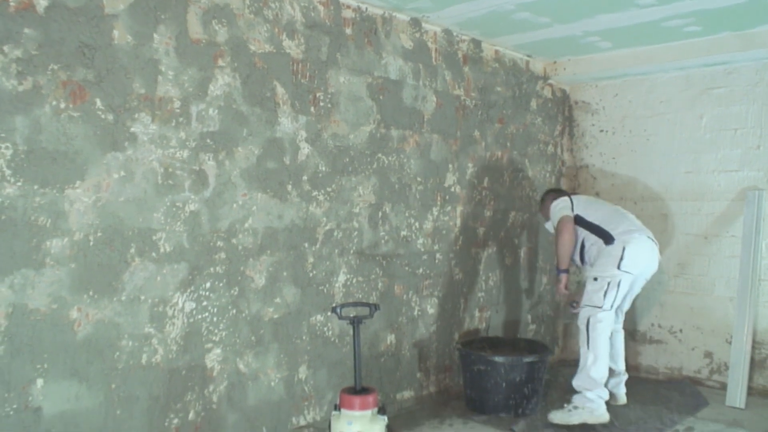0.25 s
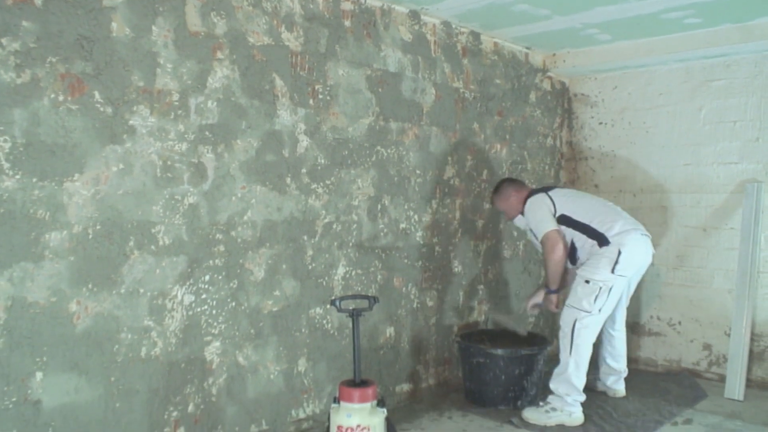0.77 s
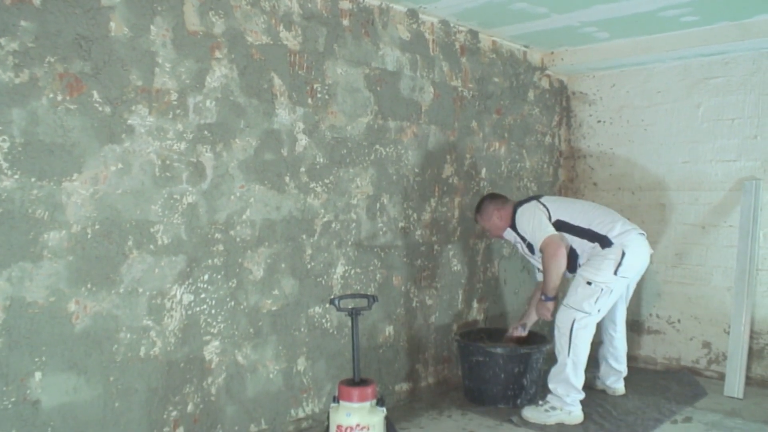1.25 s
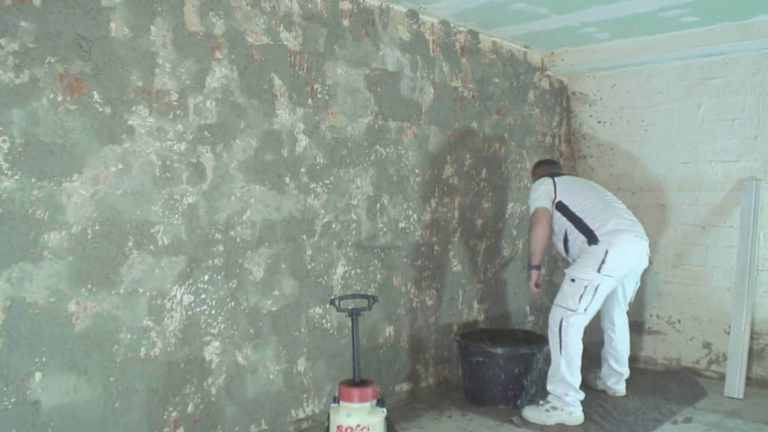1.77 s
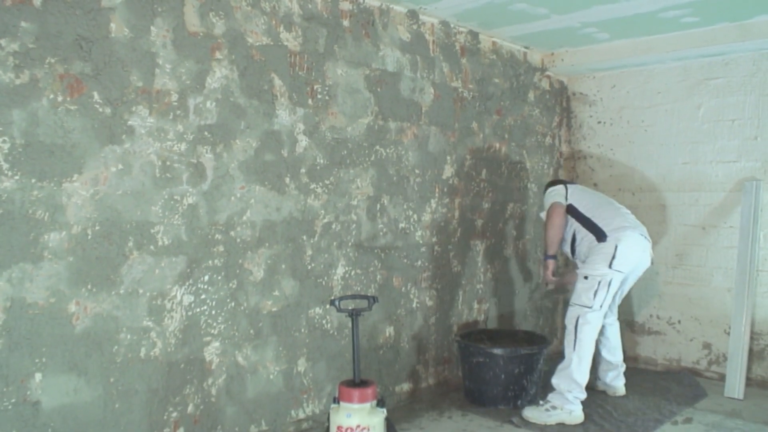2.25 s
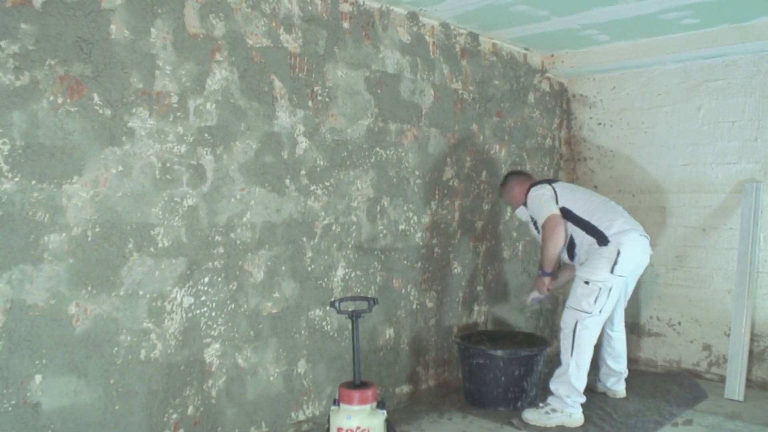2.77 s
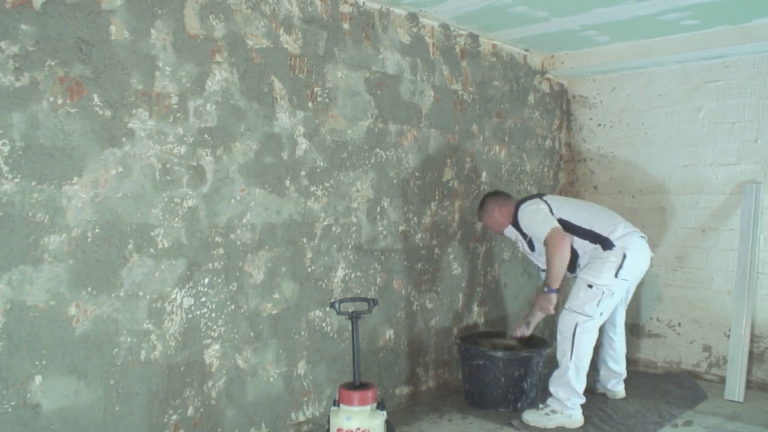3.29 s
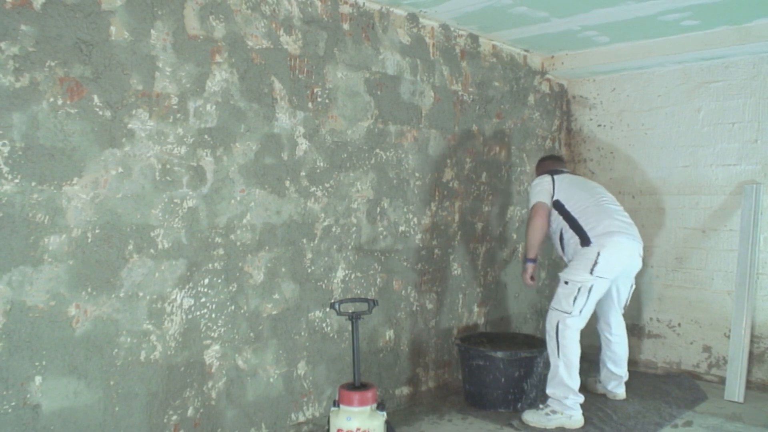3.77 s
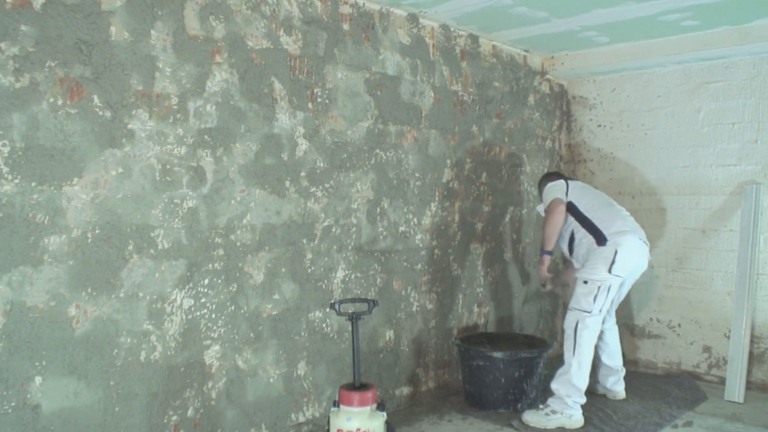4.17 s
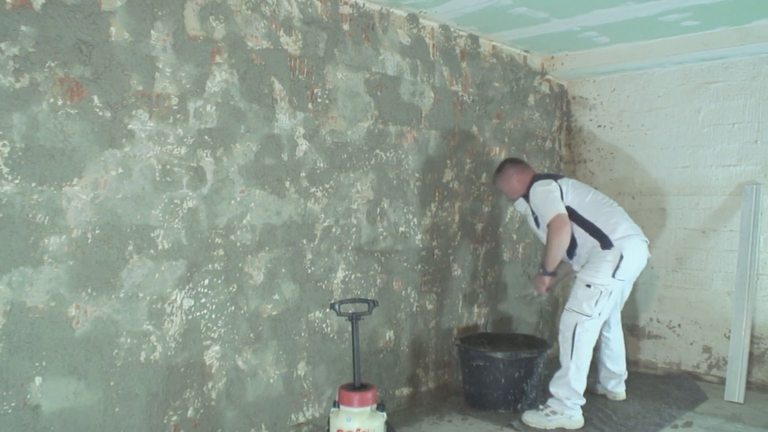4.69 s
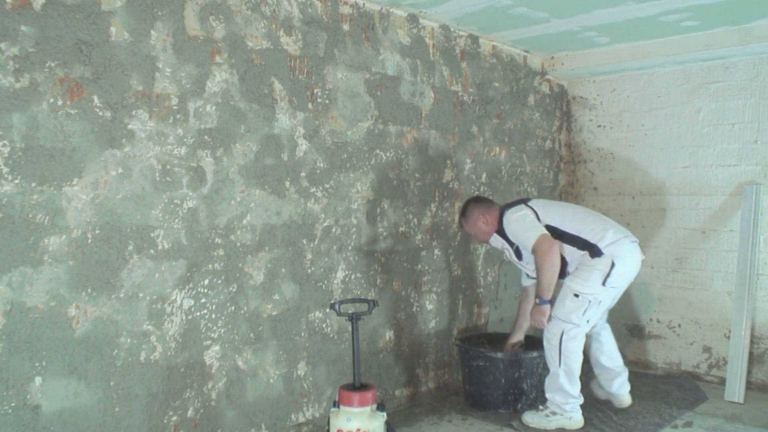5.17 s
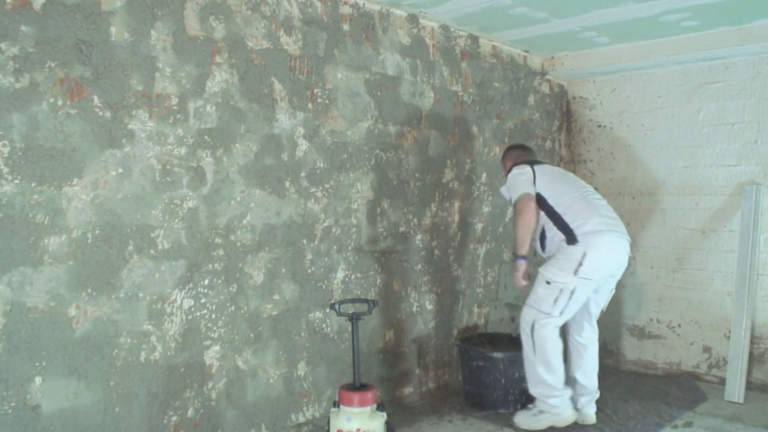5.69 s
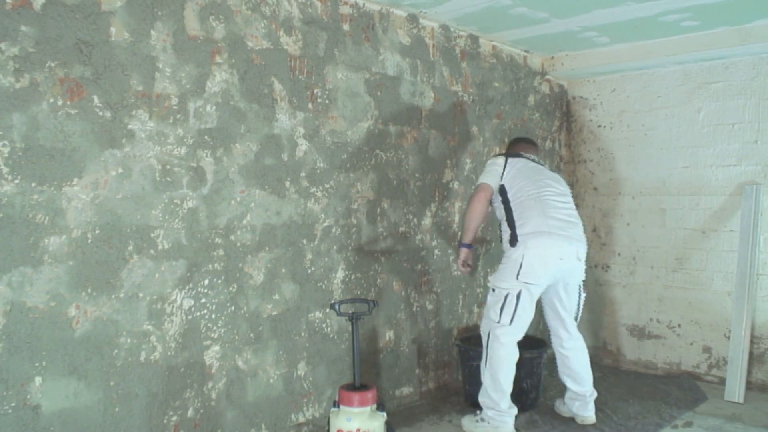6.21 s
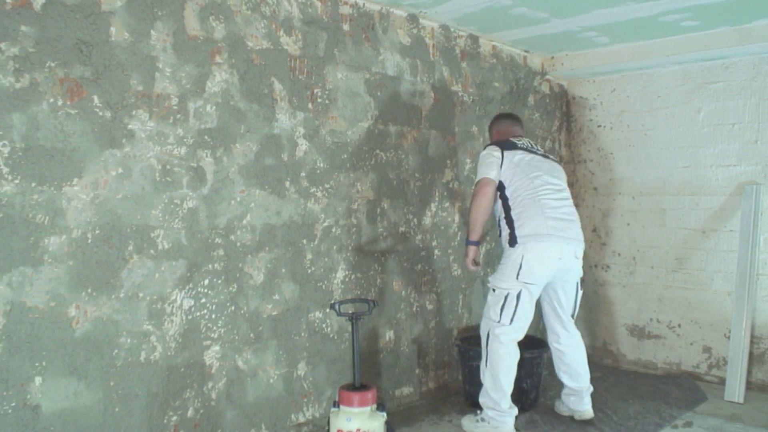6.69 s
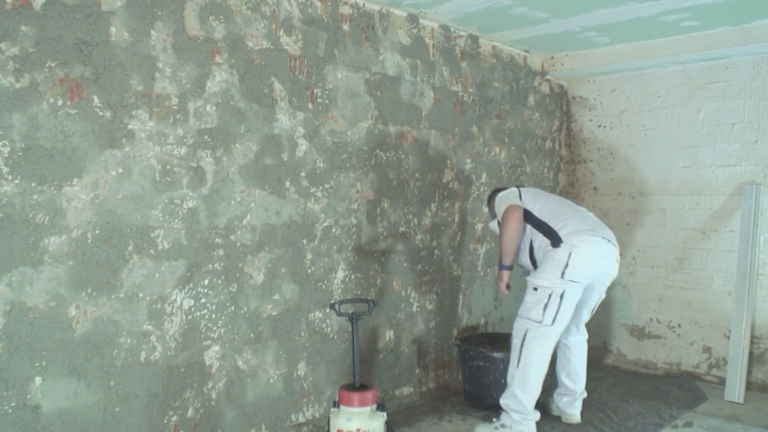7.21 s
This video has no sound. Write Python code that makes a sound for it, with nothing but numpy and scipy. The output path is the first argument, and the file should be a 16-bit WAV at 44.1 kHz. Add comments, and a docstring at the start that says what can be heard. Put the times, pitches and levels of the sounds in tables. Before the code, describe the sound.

Low wind rumble surges and puffs against the microphone throughout. Over it, four loads of mortar hit the wall with dull, sharp-edged splats and crumbs raining after. Between throws come gritty scoops, hollow tub drag, wet fizz, small cracks and knocks, and two clearer, quickly damped blade clinks. The work sounds fairly close in a hard-walled basement with a short echo.

```python
"""Wet mortar is flung at a masonry wall four times in a bare basement: click bursts with resonant
pockets make the slaps, damped sines the blobs and droplets. In between, filtered grains make the trowel
scrape, tick and squelch on a plastic tub, and decaying partials make the blade clink. A draught of shaped
noise and low puffs buffets two microphone ports and hums once, mostly across the left one."""
import sys
import numpy as np
from scipy import signal
from scipy.fft import rfft, irfft, next_fast_len
from scipy.io import wavfile
from scipy.ndimage import uniform_filter1d

SR = 44100
rng = np.random.default_rng(int(sys.argv[2]) if len(sys.argv) > 2 else 0)


def store_wav(level_fs):
    """Save 16-bit WAV to argv[1]."""
    pcm = np.round(np.clip(np.atleast_2d(level_fs), -1, 1) * 32767)
    wavfile.write(sys.argv[1], SR, pcm.T.astype(np.int16))


N = 328545
TIME = np.arange(N) / SR

# Loads sliding off the blade as the arm swings. Each row: release in seconds, level in dB before trim.
SWINGS = [(0.365, -46.5), (2.593, -49.5), (4.556, -51), (6.8, -51.5)]
# Colour of mortar hitting the wall. Each row: frequency in Hz, relative level in dB.
SLAP_COLOUR = [(120, -11.5), (250, -3), (400, -1), (600, -6.5), (850, -7), (1500, -10), (3000, -11.5),
               (6000, -11.5), (10000, -12), (15000, -18.5)]


def gain_of(db):
    """Converts decibels to amplitude."""
    return np.exp(np.asarray(db) * (np.log(10) / 20))


def evened(x):
    """Scales to rms 1."""
    return x / np.sqrt(np.mean(x ** 2) + 1e-20)


def read(points, hz):
    """Interpolates a (Hz, value) table on a log-frequency axis."""
    f, value = np.transpose(points)
    return np.interp(np.log(hz + 1), np.log(f + 1), value)


def resonance(hz, centre_hz, peak_db, width):
    """Level in dB of one resonant peak; width is a share of its pitch."""
    return peak_db / (1 + (np.log(hz / centre_hz) / width) ** 2)


def add(mix, s, sound):
    """Mixes a sound in at time s."""
    part = mix[max(round(s * SR), 0):][:len(sound)]
    part += sound[:len(part)]


def tinted(x, colour):
    """Gives a steady sound a spectrum, at rms 1."""
    size = next_fast_len(len(x), True)
    gain = gain_of(read(colour, np.fft.rfftfreq(size, 1 / SR)))
    return evened(irfft(rfft(x, size) * gain, size)[:len(x)])


def struck(x, colour, size=2048):
    """Gives a blow a spectrum by a minimum-phase filter, so that its attack stays sharp."""
    log_gain = np.log(gain_of(read(colour, abs(np.fft.fftfreq(size, 1 / SR)))))
    ring = np.fft.ifft(np.exp(np.conj(signal.hilbert(log_gain)))).real[:size // 2]
    return signal.fftconvolve(x, ring / np.linalg.norm(ring))


def grains(count, per_s, spread_db):
    """Random clicks of either sign, a few of them larger than the rest, at rms 1."""
    sizes = gain_of(spread_db * np.minimum(rng.exponential(1, count), 4))
    signs = rng.choice([-1, 1], count)
    return evened(sizes * signs * (rng.random(count) < per_s / SR))


def burst(length, per_s, spread_db, rise=0.0011):
    """A cluster of clicks that rises and dies away, its spectrum smoothed flat."""
    t = np.arange(2 ** 14) / SR
    shape = np.exp(-t / length) * (1 - np.exp(-t / rise))
    z = rfft(grains(len(t), per_s, spread_db) * shape)
    z /= np.sqrt(uniform_filter1d(abs(z) ** 2, size=70) + 1e-12)
    return evened(irfft(z) * (t < 6 * length)) * np.sqrt(np.mean(shape ** 2))


def plop(db, hz, length, glide, rise):
    """One damped resonance whose pitch slides by glide octaves in each decay time."""
    t = np.arange(0, 6 * length, 1 / SR)
    turns = np.cumsum(hz * 2 ** (glide * t / length)) / SR
    return gain_of(db) * np.sin(2 * np.pi * turns) * np.exp(-t / length) * (1 - np.exp(-t / rise))


def swell(s, length):
    """A bell-shaped rise and fall around time s."""
    out = np.zeros(N)
    near = slice(max(int((s - 3 * length) * SR), 0), int((s + 3 * length) * SR))
    out[near] = np.exp(-2 * ((TIME[near] - s) / length) ** 2)
    return out


def stroke(s, length, attack, release):
    """Grows to full strength at time s, holds, and dies away exponentially."""
    before = np.minimum(TIME - s, 0) / attack
    after = np.maximum(TIME - s - length, 0) / release
    return np.exp(np.maximum(before - after, -20))


def wander(top_hz):
    """Random motion over the two octaves below top_hz, at rms 1."""
    t, rates = TIME[::64], np.geomspace(top_hz / 4, top_hz, 16)
    motion = sum(np.sin(2 * np.pi * (hz * t + rng.random())) for hz in rates)
    return np.interp(TIME, t, evened(motion))


def patchy(x, depth_db):
    """Lets the colour wander in patches a few hundred hertz wide and some tens of ms long, at rms 1."""
    z = signal.stft(x, nperseg=512, noverlap=384)[2]
    patches = rng.standard_normal(z.shape)
    for _ in range(2):
        patches = uniform_filter1d(patches, size=5, axis=0)
        patches = uniform_filter1d(patches, size=16, axis=1)
    z = z * gain_of(depth_db * evened(patches))
    return evened(signal.istft(z, nperseg=512, noverlap=384)[1][:N])


def room_air():
    """The faint steady wash of the room: shaped noise, partly common to both channels."""
    # Each row: frequency in Hz, relative level in dB.
    air_colour = [(100, 12), (300, 4.5), (500, -7), (900, -13.5), (2000, -21.5), (5000, -31.5),
                  (11000, -37), (14000, -81), (15500, -87.5)]
    common, left, right = (tinted(rng.standard_normal(N), air_colour) for _ in range(3))
    return gain_of(-64) * (common + 2.9 * np.array([left, right]))


def gust_strength(side):
    """Strength of rumble and eddies at one port: gusts swell out of a steady lull."""
    # Each row: middle in seconds, half length in seconds, rumble level in dB, fast eddy level in dB,
    # left-right lean in dB before its share is taken.
    gusts = [(0.3, 0.19, -19.5, -44, -8), (0.922, 0.17, -19.5, -24.5, -12.5),
             (1.162, 0.098, -19.5, -23.5, 0), (2.064, 0.14, -24, -29, 7), (2.44, 1, -20, -42, -3),
             (2.938, 0.27, -26.5, -34, -2), (3.263, 0.39, -23, -43, -7), (4.09, 0.28, -18.5, -34.5, -1),
             (4.578, 0.42, -20, -47.5, -4), (5.02, 0.25, -21, -35.5, -4), (5.343, 0.46, -22.5, -39, -7.5),
             (5.885, 0.18, -17.5, -51, 0), (6.09, 0.27, -20.5, -35.5, 2), (6.83, 0.58, -18, -38, -5),
             (7.377, 0.29, -19, -44, 2)]
    # Share of the lean added at the left port and taken at the right: rumble, eddies.
    port_lean = np.array((0.33, 0.14))
    lull_rumble_db, lull_eddy_db = -30, -51
    power = gain_of([[lull_rumble_db], [lull_eddy_db]]) ** 2
    for s, length, rumble_db, eddy_db, pan_db in gusts:
        peak = gain_of(np.array([rumble_db, eddy_db]) + side * pan_db * port_lean)
        power = power + np.outer(peak, swell(s, length)) ** 2
    return np.sqrt(power)


def draught():
    """Turbulence partly shared by the ports: gusts of rumble and faster eddies, plus low puffs."""
    # Each row: frequency in Hz, relative level in dB.
    rumble_colour = [(3, 2), (9, 3.5), (20, 6.5), (38, -4.5), (55, -13.5), (80, -45.5), (130, -32.5),
                     (300, -85.5)]
    # Each row: frequency in Hz, relative level in dB.
    eddy_colour = [(30, -1), (55, 8.5), (80, 9), (105, -1), (135, -7), (190, -18), (280, -33), (500, -69),
                   (1200, -102)]
    # Sudden puffs. Each row: middle in seconds, level in dB, pitch in Hz, left-right difference in dB.
    puff_rows = [(0.894, -22.5, 79.6, -14), (1.303, -24.5, 124, -15), (2.064, -20, 61, 15),
                 (2.148, -19.5, 60.7, 11), (2.337, -31, 110, -9), (2.843, -21, 58, -16),
                 (2.926, -20, 62, -17), (3.036, -25.5, 73, -4), (4.045, -19, 75.5, 10),
                 (4.216, -25, 65.6, 14), (4.413, -28, 128, -7), (5.016, -26, 70, -14),
                 (5.061, -15.5, 31.5, -9), (5.837, -17.5, 36.3, 3), (6.041, -19.5, 61, 15),
                 (6.148, -15, 41.6, 3), (6.996, -21, 55, 6), (7.395, -21.5, 48.7, 6)]
    buffet_rms_db, buffet_top_hz = 3.5, 12
    puff_half_s = 1 / 20
    colours = (rumble_colour, eddy_colour)
    ports = np.zeros((2, N))
    shared = [tinted(rng.standard_normal(N), colour) for colour in colours]
    for port, side in zip(ports, (1, -1)):
        buffets = gain_of(buffet_rms_db * wander(buffet_top_hz))
        for colour, common, strength in zip(colours, shared, gust_strength(side)):
            swirl = tinted(rng.standard_normal(N), colour) + 0.98 * common
            # level out the noise, so that gust and buffets set the local strength
            local_power = uniform_filter1d(uniform_filter1d(swirl ** 2, size=2000), size=1400)
            port += strength * buffets * swirl / np.sqrt(local_power)
    for s, db, hz, pan_db in puff_rows:
        turns = (np.arange(SR // 10) / SR - puff_half_s) * hz
        puff = np.sin(2 * np.pi * turns) * np.exp(-(turns / .5) ** 2)
        add(ports[0], s - puff_half_s, gain_of(db + pan_db / 2) * puff)
        add(ports[1], s - puff_half_s, gain_of(db - pan_db / 2) * puff)
    return ports


def blade_work():
    """Strength of grit, drag and fizz from all scoops, swings and rubs, summed in power."""
    # Blade scooping a load from the tub. Each row: start in seconds, length in seconds, level in dB
    # before trim, wet fizz in dB re level, easing of the pressure in dB per second.
    scoops = [(0.105, 0.092, -52, -16.5, 65), (1.37, 0.55, -52.5, -3.5, 19.5),
              (3.388, 0.48, -51.5, -6.5, 9), (5.385, 0.447, -49, -8.5, 25), (6.28, 0.43, -61, -19, -1.5)]
    # Light rubs and dabs. Each row: middle in seconds, half length in seconds, then levels before trim:
    # grit in dB, drag on the tub in dB, wet fizz in dB.
    rubs = [(0.044, 0.18, -61, -54, -69), (0.55, 0.096, -46, -44.5, -69), (1.072, 0.067, -84, -62.5, -68),
            (1.277, 0.07, -72, -64, -71.5), (1.83, 0.094, -51, -48.5, -66.5), (2.41, 0.26, -78, -55, -79.5),
            (3.142, 0.21, -66, -66, -75), (3.983, 0.023, -57, -44, -65), (4.36, 0.59, -68.5, -55, -80.5),
            (4.82, 0.1, -59, -46.5, -80), (5.27, 0.32, -65.5, -52, -75), (6.005, 0.33, -59.5, -55.5, -77.5),
            (6.563, 0.55, -65, -51, -74), (7.158, 0.3, -56, -48.5, -73.5), (7.415, 0.12, -54.5, -47, -72)]
    scoop_attack_s, scoop_release_s, scoop_drag_db = 0.013, 0.026, 3.5
    bite_db, bite_s = 5, 0.14  # extra grit and fizz as the blade first cuts in
    lift_db, lift_s = 3, 0.22  # extra grit and fizz as the load tears free
    # through a scoop the fizz fades fastest and the tub drone holds up longer than the grit
    fizz_fade_db_per_s, drone_hold_db_per_s = 19, 6
    swing_rise_s, swing_release_s = 0.047, 0.065
    swing_drag_db, swing_fizz_db = -3, -7.5
    moves = []
    for s, length, db, wet_db, easing in scoops:
        age = np.clip(TIME - s, 0, length)
        tear_db = bite_db * np.exp(-age / bite_s) + lift_db * swell(s + length, lift_s)
        drag_db = scoop_drag_db + drone_hold_db_per_s * age
        fizz_db = tear_db + wet_db - fizz_fade_db_per_s * age
        levels_db = db - easing * age + np.array([tear_db, drag_db, fizz_db])
        moves.append(gain_of(levels_db) * stroke(s, length, scoop_attack_s, scoop_release_s))
    for s, db in SWINGS:
        levels = gain_of([db, db + swing_drag_db, db + swing_fizz_db])
        moves.append(np.outer(levels, stroke(s, 0, swing_rise_s, swing_release_s)))
    for s, length, *levels_db in rubs:
        moves.append(np.outer(gain_of(levels_db), swell(s, length)))
    return np.sqrt(sum(move ** 2 for move in moves))


def trowel():
    """Sand grinds along the blade, the tub drones under the drag, and wet paste fizzes as it parts."""
    # Each row: frequency in Hz, relative level in dB.
    grit_colour = [(400, -11.5), (800, 5.5), (1300, 3.5), (2000, 2), (3000, 2.5), (4500, -1.5),
                   (6500, -6.5), (10000, -17.5)]
    # Each row: frequency in Hz, relative level in dB.
    tub_colour = [(120, 7.5), (230, 4), (330, -0.5), (520, -7), (750, -14), (1200, -18.5), (3000, -49)]
    # Each row: frequency in Hz, relative level in dB.
    fizz_colour = [(3500, -5), (6000, -7), (9000, -3.5), (12000, -5), (14000, -10), (15500, -118)]
    catch_rms_db, catch_top_hz = 1, 40.63  # the blade catches and slips
    patch_rms_db = 2.6  # how far the colour of grit and fizz wanders
    grit_level, drag_level, fizz_level = blade_work() * gain_of(catch_rms_db * wander(catch_top_hz))
    # dense grit: a fine, fairly even scrape
    scrape = tinted(grains(N, per_s=1200, spread_db=1.8), grit_colour)
    drone = tinted(grains(N, per_s=900, spread_db=2.5), tub_colour)
    paste = tinted(grains(N, per_s=5000, spread_db=1.5), fizz_colour)
    grit = gain_of(-7.5) * grit_level * patchy(scrape, patch_rms_db)
    tub = gain_of(1) * drag_level * drone
    fizz = gain_of(6) * fizz_level * patchy(paste, patch_rms_db)
    return grit + tub + fizz


def handling():
    """Grit cracks and suction pops as click bursts with one cavity pitch; tub and boots knock dully."""
    # Each row: start in seconds, level in dB before trim, decay in seconds, cavity pitch in Hz.
    tick_rows = [(0.099, -48.5, 0.01, 2600), (0.253, -53, 0.0033, 5600), (0.603, -52.5, 0.0089, 7610),
                 (1.13, -61, 0.012, 8500), (1.147, -60, 0.004, 11400), (1.209, -60, 0.0031, 6000),
                 (1.244, -46.5, 0.0027, 2570), (1.29, -45, 0.004, 2760), (1.778, -58, 0.0036, 11080),
                 (1.921, -60, 0.013, 10500), (2.003, -62, 0.0054, 4250), (2.106, -62.5, 0.011, 5000),
                 (2.229, -62.5, 0.0015, 5000), (2.247, -56, 0.0034, 2970), (2.953, -68, 0.011, 10000),
                 (3.11, -62, 0.004, 10900), (3.19, -52.5, 0.0026, 3000), (3.308, -56, 0.002, 8040),
                 (3.317, -49.5, 0.0022, 3500), (3.329, -58, 0.002, 6000), (3.383, -53, 0.0028, 3000),
                 (4.197, -58, 0.011, 5040), (4.941, -63, 0.014, 10900), (5.064, -62, 0.003, 7000),
                 (5.189, -63, 0.0044, 9100), (5.226, -54, 0.003, 9000), (5.23, -46, 0.0022, 1950),
                 (5.269, -57, 0.003, 6500), (5.308, -60, 0.0017, 10100), (5.329, -49.5, 0.0014, 4430),
                 (5.379, -49.5, 0.0099, 2010), (6.276, -55.5, 0.018, 3000), (6.315, -48.5, 0.0041, 9000),
                 (7.355, -60, 0.0052, 8500), (7.386, -57.5, 0.005, 6000)]
    # Each row: start in seconds, level in dB before trim, decay in seconds, brightness in dB per octave.
    knock_rows = [(1.304, -25.5, 0.0022, -7.5), (2.259, -54, 0.0047, -7), (2.335, -39, 0.011, -11.5),
                  (3.133, -55, 0.0056, -2), (3.189, -40, 0.01, -7), (4.208, -46, 0.0094, -0.5),
                  (4.42, -39, 0.0095, -9), (6.314, -52.5, 0.011, 2), (6.376, -57.5, 0.14, -3),
                  (6.716, -45.5, 0.0045, -2), (7.263, -56, 0.027, 4.5)]
    # Each row: frequency in Hz, relative level in dB.
    tick_colour = [(300, 15), (900, 6.5), (2500, 4.5), (5000, -1.5), (8000, -3), (12000, 0), (14000, -7),
                   (15500, -12)]
    # Each row: frequency in Hz, relative level in dB.
    knock_colour = [(80, 0), (200, -4.5), (450, -4), (800, -14), (1500, -22), (4000, -53), (12000, -71)]
    cut_share = 0.45  # a cavity radiates little below this share of its pitch
    rise_share = 0.7  # attack as a share of the decay
    out, hz = np.zeros(N), np.geomspace(100, 16000, 80)
    for s, db, length, cavity_hz in tick_rows:
        level = read(tick_colour, hz) + resonance(hz, cavity_hz, peak_db=2, width=0.18)
        level -= 10 * np.log10(1 + (cut_share * cavity_hz / hz) ** 4)
        crack = burst(length, per_s=4000, spread_db=2, rise=rise_share * length)
        add(out, s, gain_of(db + 9.5) * struck(crack, np.transpose([hz, level])))
    for s, db, length, bright_db in knock_rows:
        colour = [(f, level + bright_db * np.log2(f)) for f, level in knock_colour]
        add(out, s, gain_of(db + 12) * struck(burst(length, per_s=1300, spread_db=2), colour))
    return out


def squelches():
    """Air pockets in the paste ring broadly and rise as they close; at times wet sand slides with a hiss."""
    # Each row: middle in seconds, level in dB before a bell window, half length in seconds, pitch in Hz.
    squelch_rows = [(0.16, -60.5, 0.12, 2330), (0.493, -49, 0.054, 800), (0.494, -53, 0.046, 1720),
                    (0.568, -50.5, 0.019, 2700), (0.597, -49.5, 0.036, 714), (1.492, -62, 0.14, 1140),
                    (1.826, -59.5, 0.13, 940), (1.915, -65, 0.12, 1540), (2.555, -66, 0.038, 3060),
                    (3.472, -58, 0.15, 1190), (3.656, -50.5, .22, 273), (3.686, -59, 0.21, 2860),
                    (4.545, -52.5, 0.028, 3200), (5.678, -64, 0.1, 2840), (6.496, -64, 0.12, 2060),
                    (6.792, -58, 0.039, 3080)]
    # Each row: middle in seconds, level in dB, half length in seconds.
    slides = [(0.618, -58, 0.083), (0.805, -59.5, 0.16), (4.315, -72, 0.12), (4.82, -60, 0.16),
              (6.512, -62, 0.16)]
    # Each row: frequency in Hz, relative level in dB.
    slide_colour = [(3500, -15), (5200, -11.5), (7000, -16.5), (8200, -12.5), (9000, -6.5), (11500, -5),
                    (13200, -9), (14000, -42), (15500, -30)]
    rise_octaves = 0.3
    out = np.zeros(N)
    for s, db, length, hz in squelch_rows:
        count = int(2 * length * SR)
        pocket = [(hz / 3, -40), (hz / 1.4, -14), (hz, 0), (hz * 1.33, -14), (hz * 3, -40)]
        ring = tinted(grains(2 * count, per_s=850, spread_db=1), pocket)
        # reading faster and faster raises the pitch
        closing = np.cumsum(2 ** (rise_octaves * np.linspace(-.5, .5, count)))
        rising = np.interp(closing, np.arange(2 * count), ring)
        add(out, s - length, gain_of(db) * np.hanning(count) * rising)
    sliding = sum(gain_of(db) * swell(s, length) for s, db, length in slides)
    return out + sliding * tinted(grains(N, per_s=8700, spread_db=2), slide_colour)


def slaps():
    """Each lump squashes flat: its mass thuds, trapped air pockets pop, and water spits out."""
    # Each row: start in seconds, level in dB before trim, decay in seconds, heavy thud in dB,
    # wet spray in dB, large air pocket in Hz, small air pocket in Hz.
    lumps = [(0.371, -40.5, 0.016, 4.5, 3, 3530, 7800), (0.377, -35, 0.0069, -0.5, -9, 1480, 4490),
             (0.385, -32.5, 0.0056, 1, -5.5, 1300, 2390), (0.392, -35, 0.0031, 11, -5, 980, 1810),
             (2.6013, -28.5, 0.0039, 1.5, -3.5, 3180, 5100), (2.607, -33.5, 0.0054, 8, -4, 960, 5160),
             (4.559, -38.5, 0.017, 5.5, -4.5, 1740, 4400), (4.576, -38, 0.013, 8, -6, 630, 1470),
             (4.596, -40.5, 0.004, 1, -1, 1650, 5600), (6.8042, -28.5, 0.0044, -1, -15, 1530, 3800),
             (6.809, -32.5, 0.0061, 1, 2, 1020, 2890)]
    out, hz = np.zeros(N), np.geomspace(100, 16000, 400)
    for s, db, spread, thud_db, spray_db, *pockets in lumps:
        tilt = [(600, thud_db), (1300, 0.0026), (3000, 0.0043), (8000, spray_db)]
        level = read(SLAP_COLOUR, hz) + read(tilt, hz)
        for pocket_hz in pockets:
            level += resonance(hz, pocket_hz, peak_db=6.5, width=0.08)
        lump = burst(spread, per_s=3500, spread_db=2)
        add(out, s, gain_of(db + 7.5) * struck(lump, np.transpose([hz, level])))
    return out


def blobs():
    """The soft mass of each load, and blobs dropping off it, land with a damped, slightly falling plop."""
    # Each row: start in seconds, level in dB, pitch in Hz, decay in seconds.
    blob_rows = [(0.378, -26.5, 594, 0.0069), (0.386, -31, 436, 0.006), (0.485, -45, 530, 0.0064),
                 (2.603, -26, 415, 0.0058), (2.626, -35.5, 370, 0.0088), (2.644, -33, 530, 0.0076),
                 (2.666, -32, 610, 0.0055), (4.56, -24.5, 620, 0.0035), (4.578, -19.5, 392, 0.0057),
                 (4.606, -34, 483, 0.0082), (4.633, -34, 388, 0.01), (4.655, -36, 350, 0.007),
                 (4.68, -38, 500, 0.0061), (4.725, -36.5, 580, 0.0088), (4.82, -43, 448, 0.009),
                 (6.805, -20.5, 507, 0.0053), (6.832, -32, 497, 0.006), (6.903, -31.5, 420, 0.0062),
                 (6.943, -29.5, 547, 0.0074)]
    out = np.zeros(N)
    for s, db, hz, length in blob_rows:
        add(out, s, plop(db, hz, length, glide=-0.042, rise=0.0011))
    return out


def spatter():
    """Loose crumbs rain on wall and floor; the wettest pop as droplets, each at its own pitch."""
    # Each row: start in seconds, level in dB before trim, decay in seconds, wet spray in dB.
    crumbs = [(0.412, -49.5, 0.06, -5), (0.475, -53, 0.027, 0), (0.548, -64, 0.017, 3),
              (2.611, -35.5, 0.038, -1.5), (2.68, -58, 0.042, -10), (4.603, -37, 0.045, -9),
              (4.697, -54.5, 0.12, -14), (6.825, -39.5, 0.078, -12), (6.926, -45, 0.046, -17)]
    droplet_count, droplet_cycles = 50, 4  # number per throw, decay in cycles
    loudest_db, fade_db_per_s = -35, 58.5  # level before the fade, size and pitch losses
    wait_s, span_s = 0.04, 0.36
    low_hz, high_hz = 1098, 5000
    out = np.zeros(N)
    for s, db, length, spray_db in crumbs:
        colour = [(hz, level + read([(2500, 0), (9000, spray_db)], hz)) for hz, level in SLAP_COLOUR]
        patter = burst(length, per_s=600, spread_db=1, rise=0.025)
        add(out, s, gain_of(db - 0.5) * struck(patter, colour))
    for s, _ in SWINGS:
        for when, pitch, size in rng.random((droplet_count, 3)):
            delay = wait_s + span_s * when
            hz = low_hz * (high_hz / low_hz) ** pitch
            db = loudest_db - fade_db_per_s * delay - 9 * size - 5 * pitch
            add(out, s + delay, plop(db, hz, droplet_cycles / hz, glide=0.05, rise=0.0006))
    return out


def port_hum():
    """Vortices shed at the port edge; their pitch follows the air speed, given as a pitch track."""
    # Each row: time in seconds, pitch in Hz, level in dB before the port gains.
    hum_track = [(0.929, 90.4, -76), (0.972, 111.9, -34.5), (1.021, 123.7, -25.5), (1.06, 130.8, -23.5),
                 (1.091, 124.3, -19.5), (1.13, 110, -45)]
    # Each row: multiple of the pitch, level in dB re the track.
    partials = [(1, 1.5), (2, -23), (3, -32.5), (4, -44)]
    s, hz, db = np.transpose(hum_track)
    turns = np.cumsum(np.interp(TIME, s, hz)) / SR
    tone = sum(gain_of(level) * np.sin(2 * np.pi * round(k) * turns) for k, level in partials)
    strength = gain_of(np.interp(TIME, s, db, left=-120, right=-120))
    return tone * strength * gain_of([[2.5], [-12]])  # left, right


def clinks():
    """The steel blade rings only briefly, damped by the mortar on it: a sum of decaying partials."""
    # Each row: start in seconds, level in dB before trim.
    clink_rows = [(2.02, -48), (3.979, -34.5), (6.073, -51), (6.091, -27.5)]
    # Each row: frequency in Hz, relative level in dB, time to fall 60 dB in seconds.
    blade_modes = [(2127, 2, 0.036), (2360, -1, 0.015), (1556, -1, 0.021), (2750, -2.5, 0.019),
                   (3100, -17, 0.034), (3840, -22, 0.026), (4630, -14, 0.022)]
    out, t = np.zeros(N), np.arange(SR // 4) / SR
    ring = np.zeros(len(t))
    for hz, db, t60 in blade_modes:
        ring += gain_of(db - 60 * t / t60) * np.sin(2 * np.pi * (hz * t + rng.random()))
    for s, db in clink_rows:
        add(out, s, gain_of(db - 11.5) * ring * (1 - np.exp(-t / 0.00056)))
    return out


def placed(x, width, left_db):
    """Direct sound, coloured by reflections off wall and floor and widened by a short random filter."""
    # Each row: delay in seconds, amplitude re the direct sound.
    reflections = [(0.00198, 0.24), (0.0046, 0.16), (0.0073, 0.13)]
    early = evened(rng.standard_normal(300) * np.hanning(300)) / np.sqrt(300)
    paths = np.zeros(400)
    paths[0] = 1
    for delay, share in reflections:
        paths[round(delay * SR)] = share
    mid = signal.oaconvolve(x, paths / np.linalg.norm(paths))[:N]
    side = width * signal.oaconvolve(x, early)[:N]
    return np.array([(mid + side) * gain_of(left_db / 2), (mid - side) * gain_of(-left_db / 2)])


def basement(x, onset=0.0005, build=0.021):
    """Diffuse echo of bare masonry: sparse random taps that decay at a rate set for each frequency."""
    # Each row: frequency in Hz, time to fall 60 dB in seconds.
    room_t60 = [(150, 0.51), (500, 0.91), (1000, 0.72), (2500, 0.68), (5000, 0.61), (9000, 0.43),
                (15000, 0.3)]
    # Each row: frequency in Hz, relative level in dB.
    room_colour = [(150, 9.5), (450, 0), (900, 3), (3000, 0), (7000, -1), (14000, 0.5)]
    # Each row: frequency in Hz, left-right likeness from 0 to 1.
    room_likeness = [(150, 0.39), (600, 0.87), (2000, 0.89), (6000, 0.2), (15000, 0.46)]
    taps = rng.standard_normal((2, SR)) * (rng.random((2, SR)) < .15)
    hz, t, z = signal.stft(taps, SR, nperseg=256)
    same = np.clip(read(room_likeness, hz), 0, 1)[:, None]
    mid, side = np.sqrt(1 + same) * z[0], np.sqrt(1 - same) * z[1]
    decay_db = read(room_colour, hz)[:, None] - 60 * t / read(room_t60, hz)[:, None]
    z = np.array([mid + side, mid - side]) * gain_of(decay_db)
    tail = signal.istft(z, SR, nperseg=256)[1][:, :SR]
    tail = tail * np.clip((TIME[:SR] - onset) / build, 0, 1)
    return signal.fftconvolve(x[None], tail / np.linalg.norm(tail[0]), axes=1)[:, :N]


def echoes(x):
    """Crossfades round three tails, 45 steps a second, so that the echo stays smooth and does not ring."""
    turn = (TIME * 45) % 3
    out = 0
    for k in range(3):
        distance = abs((turn - k + 3 / 2) % 3 - 3 / 2)
        share = np.cos(np.pi / 2 * np.minimum(distance, 1))
        out = out + basement(x * share)
    return out


def scene():
    """Wall and tub in the echoing basement, with the draught right at the microphone."""
    scoop = trowel() + squelches()
    small = handling()
    wall = slaps() + blobs() + spatter()
    steel = clinks()
    direct = placed(scoop, width=0.45, left_db=0.5)
    direct += placed(small + steel, width=0.42, left_db=-0.5)
    direct += placed(wall, width=0.33, left_db=2.5)
    sent = gain_of(-13.5) * scoop + gain_of(-8.5) * small + gain_of(-7.5) * wall + gain_of(-22) * steel
    echo = echoes(sent) * gain_of([[1.1], [-1.1]])
    return direct + echo + room_air() + draught() + port_hum()


def record(dry):
    """Limits the band with a steep low-pass filter."""
    edge_hz = 15400
    low_pass = signal.firwin(401, edge_hz, window=("kaiser", 9), fs=SR)
    return signal.oaconvolve(dry, low_pass[None], "same")


dry = scene()
out = record(dry)
store_wav(out)
```